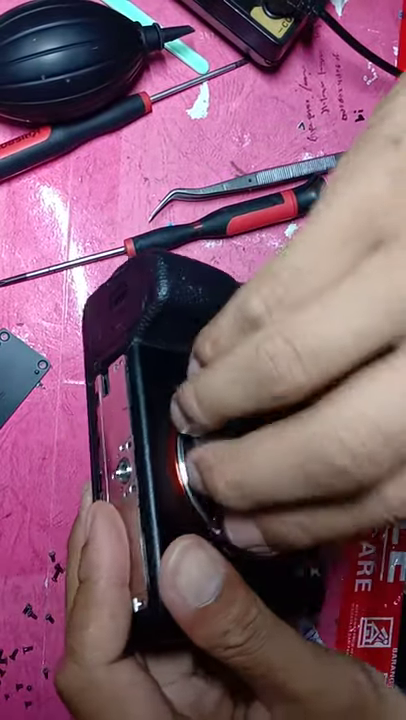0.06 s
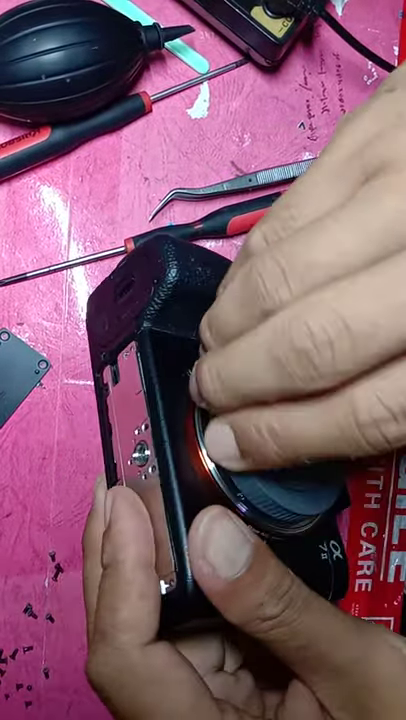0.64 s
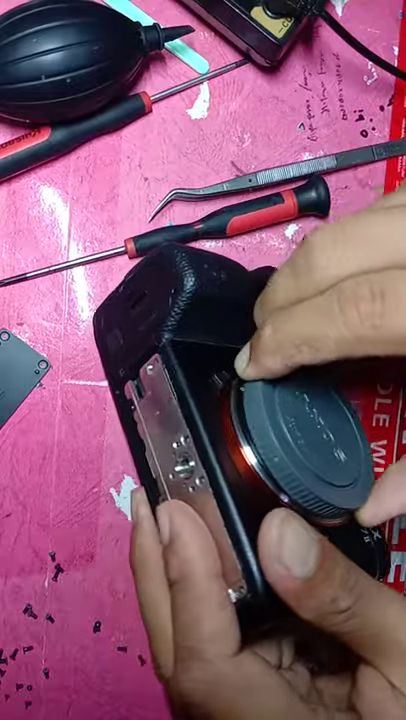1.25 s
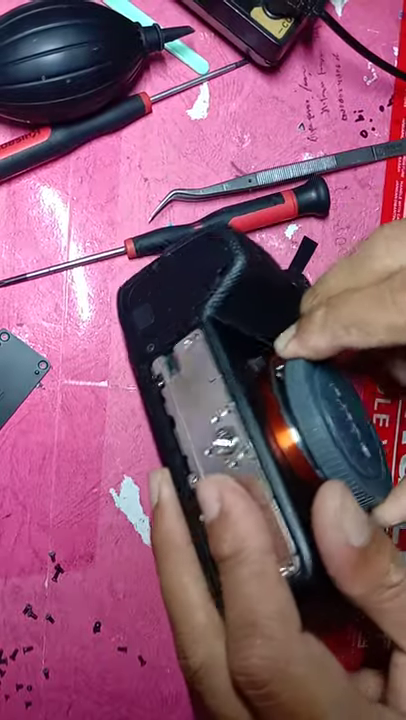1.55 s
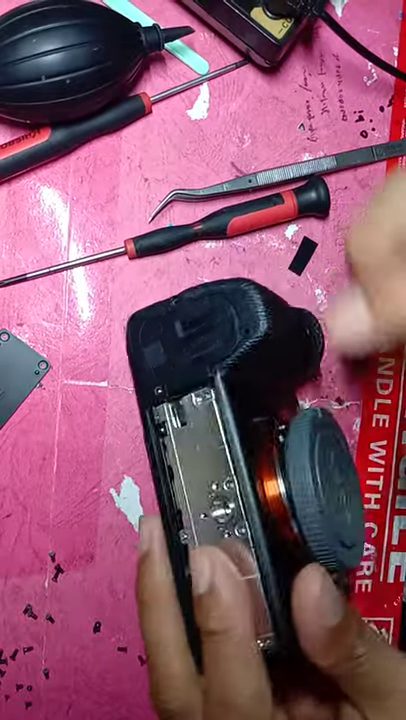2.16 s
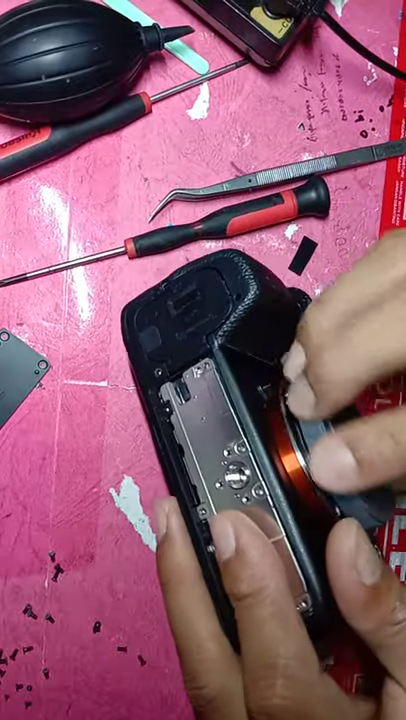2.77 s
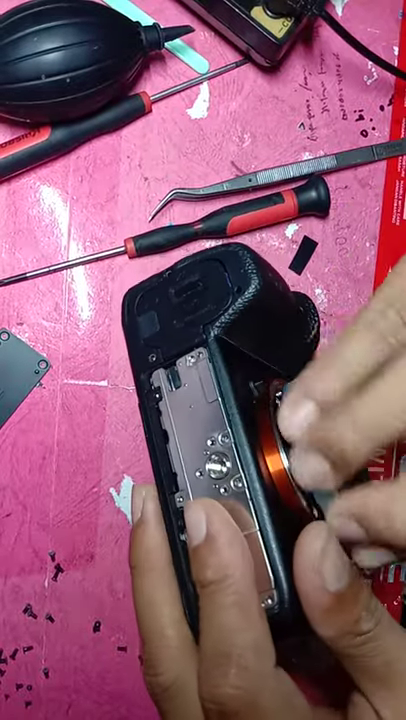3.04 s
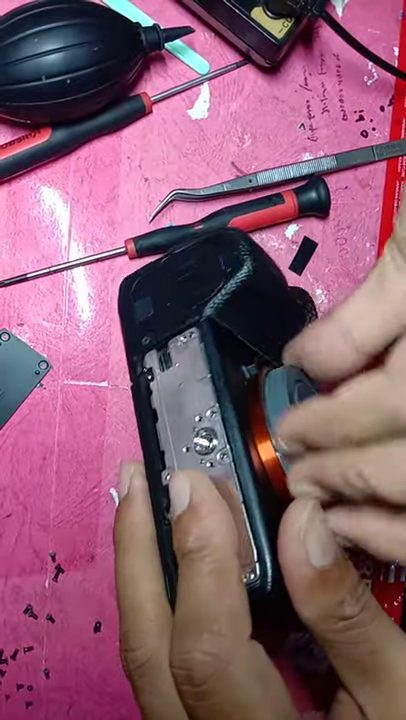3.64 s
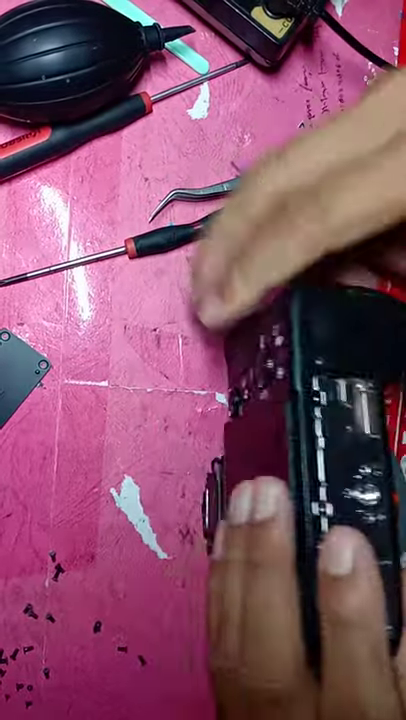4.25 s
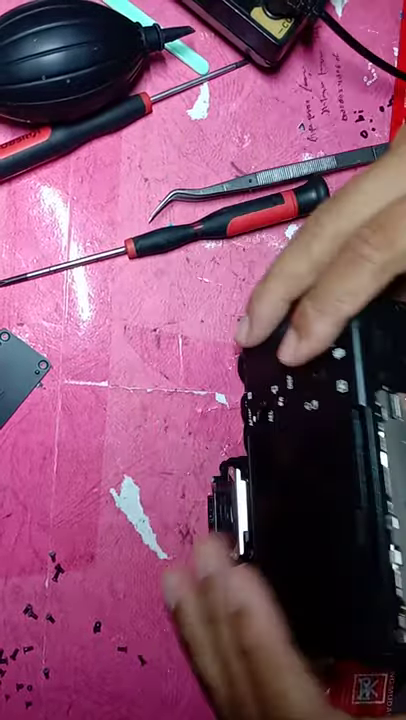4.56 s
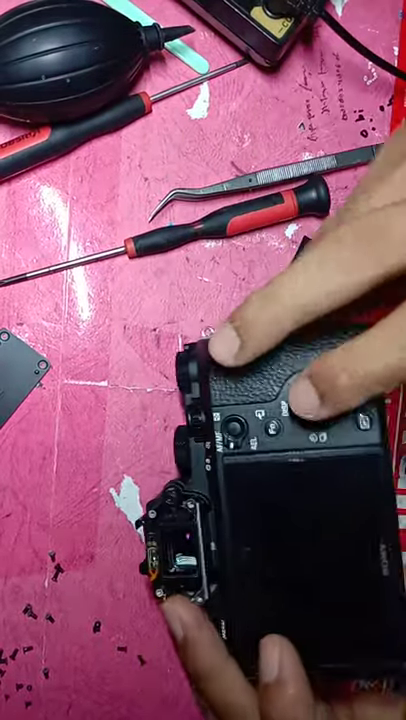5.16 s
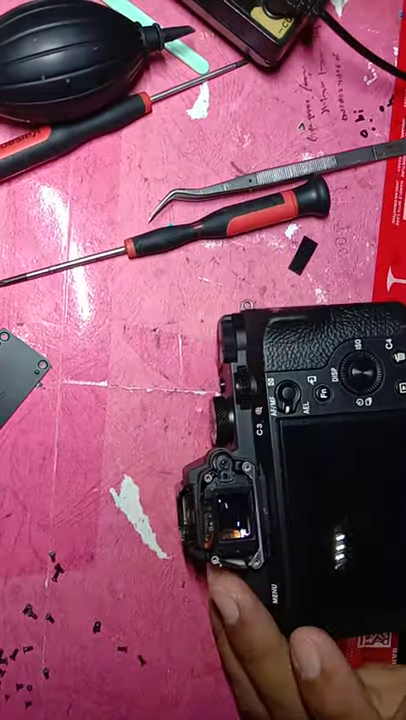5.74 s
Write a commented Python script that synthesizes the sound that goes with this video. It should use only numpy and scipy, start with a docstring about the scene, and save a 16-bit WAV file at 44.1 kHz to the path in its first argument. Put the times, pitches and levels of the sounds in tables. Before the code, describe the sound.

A few light plastic ticks and hollow knocks open the sound as a cap is placed against a camera body, with more small taps between 0.5 and 0.8 seconds. At about 1.1 seconds comes a bright snap with a soft bump in the workbench. Faint taps and brief finger rubs follow, then a firmer double knock at 2.6 seconds and more rubbing and ticking around 3 seconds. At 3.4 seconds a short scrape leads into a sharp, loud snap as the cap locks. The camera lands on the bench with a dull thud at 4.1 seconds, followed by softer bumps, ticks and a faint drag. At 4.8 seconds its casing tips down with a quick, hard clack, and one faint bump comes near 5.3 seconds. Everything is close and centred, with short small-room reflections over a quiet hollow room tone and hiss.

```python
"""Capping a camera on a workbench.

A plastic cap is fitted to a camera body and twisted until it snaps home; the camera is then laid down.
Each contact rings the cap or the casing, bumps thud in the bench, and a small room throws it all back.
Fingers rub the plastic in between, over a quiet, hollow room tone."""
import sys
import numpy as np
from scipy import signal
from scipy.fft import rfft, irfft, next_fast_len
from scipy.io import wavfile
from scipy.ndimage import uniform_filter1d

SR = 44100
rng = np.random.default_rng(int(sys.argv[2]) if len(sys.argv) > 2 else 0)


def transcribe(u):
    """Save the signal u as a 16-bit wav file named by the first command-line argument.

    u: samples, shape (n,) or (channels, n), limited to [-1, 1]; the rate is SR.
    q: integer samples, one column per channel.
    """
    v = np.clip(np.atleast_2d(u).T, -1, 1)
    q = np.round(v * 32767).astype(np.int16)
    wavfile.write(sys.argv[1], SR, q)


N = 260278
T = np.arange(N) / SR
BLOW_SAMPLES = 4096

# bands that shape a blow: edge_hz
BAND_EDGES_HZ = [70, 400, 780, 1500, 2500, 4200, 6500, 15500]
# hiss spectrum: freq_hz, gain_db
HISS_SPECTRUM = [(500, 0), (3000, 0), (5700, 0), (7000, -6), (8500, -5), (13500, -10), (15200, -5)]


def contacts(crack_db=-5, scrape_db=-6, graze_lead_s=.0055):
    """Bright bayonet snaps, dull knocks of the cap, and thin fingernail ticks on the camera's plastic."""
    # time_s, contact_s, level_db, hollow_db, rim_db
    snaps = [(1.0571, .00083, -44, 17, 16), (3.4104, 0.0011, -29.5, 7, 4.5)]
    knocks = [(.081, 0.001, -57, 2, 8.5), (.112, 0.0015, -48, 17, 0.5), (.2281, 0.0043, -63, 14.5, -6),
              (.547, 0.0043, -57.5, 13.5, 12.5), (.576, 0.0034, -48.5, 4, -4), (.68, 0.0026, -56.5, 0, -13),
              (.7672, 0.0021, -46.5, 10.5, 11.5), (1.261, 0.0016, -53.5, 10, 13),
              (1.494, 0.0019, -74.5, 19.5, 4), (1.796, 0.0015, -69, 11.5, -2),
              (1.929, .0017, -56, -7, -7.5), (2.473, 0.0045, -54.5, -0.5, -21),
              (2.621, 0.0015, -45.5, 10.5, -8), (2.63, 0.001, -36, 9, 1), (2.921, 0.0036, -55, 11.5, 0),
              (2.962, 0.0035, -59.5, 2, -4), (2.998, 0.0013, -63.5, 5, -9),
              (3.36, 0.0073, -56.5, -4.5, -26), (4.498, 0.0027, -57, 1, 4.5), (5.335, 0.007, -71, 11.5, -1)]
    ticks = [(.0585, 0.0011, -49.5, 5.5, -11), (4.146, .003, -57.5, 15, -5), (4.48, 0.003, -56, -4, 5.5)]
    # spectrum of each kind: freq_hz, band_db
    snap_spectrum = [(170, -3.5), (550, 2), (1100, 2.5), (1900, -2), (3200, -1.5), (5200, 0), (10000, 1.5)]
    knock_spectrum = [(170, -9), (550, 2.5), (1100, 3), (1900, -2), (3200, -6), (5200, -14.5), (10000, -25)]
    tick_spectrum = [(170, -18), (550, -30.5), (1100, 1), (1900, -4.5), (3200, -0.5), (5200, -11),
                     (10000, -19.5)]
    out = np.zeros(N)
    for blows, spectrum in [(snaps, snap_spectrum), (knocks, knock_spectrum), (ticks, tick_spectrum)]:
        for time_s, contact_s, level_db, hollow_db, rim_db in blows:
            click = bench_bounce(plastic_click(contact_s, crack_db, scrape_db))
            click = match_bands(click, level_db + band_shape_db(spectrum, hollow_db, rim_db))
            add(out, click, time_s - contact_s / 2)
            # a slow contact grazes before it lands
            graze_gain = min(contact_s / .0035, .6) ** 2
            graze = signal.fftconvolve(click, crack(.003) / np.sqrt(SR / 100))
            add(out, graze_gain * graze, time_s - graze_lead_s)
    return out


def plastic_click(contact_s, crack_db, scrape_db, sharp_s=.0016):
    """A short contact rings the plastic at once; a long one is mostly slips that keep exciting it."""
    # cap over the hollow of the mount: pitch_hz, level_db, t60_s
    cap_modes = [(445, -14, .03), (595, -3, 0.023), (865, 1.5, 0.0089), (1093, -6, 0.0083),
                 (1620, -12, .018), (2028, -10, .022), (3010, -9, .014), (3550, -17, 0.027),
                 (4620, -18, 0.012), (5840, -14, .015), (8650, -15, 0.0021), (9200, -12, .0079)]
    # edge crack with the wall's broad resonances: freq_hz, gain_db
    edge_spectrum = [(900, -11), (2100, 2.5), (2400, -2.5), (2900, 3.5), (3500, 8.5), (4000, -7), (4650, 3),
                     (5150, -4), (5550, 7.5), (6300, -10.5), (7900, -5.5), (9100, 5.5), (10200, -4.5),
                     (12300, -14), (13300, -24.5)]
    ringing = ring(cap_modes, detune=.012, scatter_db=1.5)
    slips = crack(contact_s)
    touch = colour(ringing, [(1500, -3), (3000, -10), (6000, -18.5)])
    scrape = signal.fftconvolve(ringing, slips)[:BLOW_SAMPLES]
    return (np.exp(-contact_s / sharp_s) * touch / blow_level(touch)
            + undb(scrape_db) * scrape / blow_level(scrape)
            + undb(crack_db) * colour(slips, edge_spectrum))


def band_shape_db(spectrum, hollow_db, rim_db, hollow_hz=1000, hollow_oct=.5, rim_hz=3500, rim_oct=.55):
    """The point of contact sets how much the air under the cap and the stiff rim ring."""
    edges_hz = np.array(BAND_EDGES_HZ)
    centres_oct = np.log2(edges_hz[1:] * edges_hz[:-1]) / 2
    freq_hz, band_db = np.transpose(spectrum)
    hollow = np.exp(-((centres_oct - np.log2(hollow_hz)) / hollow_oct) ** 2)
    rim = np.exp(-((centres_oct - np.log2(rim_hz)) / rim_oct) ** 2)
    return np.interp(centres_oct, np.log2(freq_hz), band_db) + hollow_db * hollow + rim_db * rim


def match_bands(blow, band_db):
    """Filter a blow towards a level per band: where and how hard the edges meet."""
    edges_hz = np.array(BAND_EDGES_HZ)
    edge_bins = (edges_hz * BLOW_SAMPLES / SR).astype(int)
    centres_hz = np.sqrt(edges_hz[1:] * edges_hz[:-1])
    blow = colour(blow, [(30, -40), (80, -14.5), (140, 1)])  # a small part radiates little bass
    for _ in range(3):
        energy = np.add.reduceat(np.abs(rfft(blow)) ** 2, edge_bins)[:-1] * 2 / BLOW_SAMPLES
        current_db = 10 * np.log10(energy / (SR / 100))
        blow = colour(blow, np.column_stack([centres_hz, band_db - current_db]))
    return blow


def casing(crack_db=-4):
    """The camera tips onto its hard front edge and the casing chatters."""
    # landings: start_s, level_db, contact_s
    knocks = [(4.8249, -39, 0.00036), (4.8273, -32, 0.00156), (4.8291, -34, 0.00081)]
    # casing resonances: pitch_hz, level_db, t60_s
    case_modes = [(511, -5.5, 0.018), (905, 2.5, 0.015), (1467, -7, 0.017), (2090, -9, 0.034),
                  (3030, -5, 0.0099), (3510, -2.5, 0.027), (4200, -32, 0.03), (5330, -31, 0.0084),
                  (6900, -19, 0.011)]
    # freq_hz, gain_db
    edge_spectrum = [(35, -37), (150, 10.5), (500, 1.5), (2000, 5), (3500, 7.5), (5500, 1),
                     (8000, -7.5), (11000, -13), (15000, -46)]
    out = np.zeros(N)
    for start_s, level_db, contact_s in knocks:
        ringing = ring(case_modes, detune=.004, scatter_db=1)
        edge = colour(crack(contact_s), edge_spectrum)
        add(out, undb(level_db) * (ringing / blow_level(ringing) + undb(crack_db) * edge), start_s)
    return out


def bench(rattle_db=-19):
    """Soft pushes make the bench top thud; loose parts in the camera rattle."""
    # padded bumps: start_s, level_db, push_s
    bumps = [(.113, -49, 0.0034), (1.058, -40.5, 0.0014), (3.411, -45, 0.002), (1.496, -77, 0.0021),
             (1.71, -68, 0.0044), (1.796, -60, 0.0029), (1.832, -65, 0.0041), (1.898, -55, 0.003),
             (4.075, -34.5, 0.0036), (4.0823, -26, 0.0011), (4.225, -65, 0.00092), (4.2288, -39, 0.0021),
             (4.51, -58, 0.0067), (4.639, -48.5, 0.0035), (5.31, -61, 0.0057)]
    # bench top resonances: pitch_hz, level_db, t60_s
    bench_modes = [(130, -4.5, 0.047), (215, -1, 0.046), (290, -2, 0.045), (496.4, -13, 0.063),
                   (655, -13.5, 0.029), (1037, -6, 0.033)]
    # freq_hz, gain_db
    rattle_spectrum = [(50, -5.5), (200, 25), (700, 25), (1300, 13.5), (3000, .5),
                       (9000, -27), (15000, -40)]
    out = np.zeros(N)
    for start_s, level_db, push_s in bumps:
        age = np.arange(BLOW_SAMPLES) / SR / push_s
        push = age * np.exp(-6 * age)
        ringing = ring(bench_modes, detune=.0053, scatter_db=.04)
        thud = colour(signal.fftconvolve(ringing, push)[:BLOW_SAMPLES], [(30, -4.5), (110, 1.5)])
        rattle = colour(crack(.012), rattle_spectrum)
        add(out, undb(level_db) * (thud / blow_level(thud) + undb(rattle_db) * rattle), start_s)
    return out


def ring(modes, detune, scatter_db):
    """Damped modes; grip and point of contact shift their pitch and strength at each blow."""
    t = np.arange(BLOW_SAMPLES) / SR
    pitch_hz, level_db, t60_s = np.transpose(modes)[:, :, None]
    pitch_hz = pitch_hz * (1 + detune * rng.standard_normal(pitch_hz.shape))
    level_db = level_db + scatter_db * rng.standard_normal(level_db.shape)
    sign = (-1) ** np.arange(len(modes))[:, None]
    decay = np.exp(-np.log(1000) * t / t60_s)
    return np.sum(sign * undb(level_db) * np.sin(2 * np.pi * pitch_hz * t) * decay, axis=0)


def crack(rise_s):
    """Pitchless burst of tiny slips as two hard edges meet."""
    age = np.arange(BLOW_SAMPLES) / SR / rise_s
    envelope = age * np.exp(-age)
    burst = envelope * rng.standard_normal(BLOW_SAMPLES)
    for _ in range(5):
        whitened = irfft(np.exp(1j * np.angle(rfft(burst))))
        burst = whitened * np.minimum(4 * envelope, 1)
    return burst / blow_level(burst)


def fingers(slips_per_s=1500, spread_db=3.5, uneven_db=-.5):
    """Skin and plastic stick and slip in dense grains; dragging the camera makes the bench drone."""
    # fingers on plastic, camera on the mat: start_s, end_s, level_db
    rubs = [(0, 0.02, -55), (1.888, 1.986, -55.5), (2.458, 2.513, -54), (2.919, 3.043, -52),
            (3.143, 3.261, -61.5), (3.341, 3.402, -49.5), (3.575, 3.755, -58), (3.957, 4.05, -61.5)]
    drags = [(1.49, 1.68, -63), (2.75, 3.05, -66.5), (4.53, 4.7, -63)]
    # their spectra: freq_hz, gain_db
    rub_spectrum = [(50, -33.5), (160, 1), (420, -8.5), (650, -5.5), (1000, 5), (1700, -10.5),
                    (3200, -19.5), (6000, -31.5), (12000, -53.5)]
    drag_spectrum = [(40, -44.5), (110, -18), (142, -1.5), (160, 2.5), (178, -11), (220, -20.5),
                     (320, -33.5), (600, -31), (3000, -71)]
    slips = (rng.random(N) < slips_per_s / SR) * rng.standard_normal(N)
    slips *= undb(spread_db * np.minimum(rng.exponential(size=N), 3))
    rubbing = strokes(rubs) * undb(uneven_db * drift(70)) * unit(colour(slips, rub_spectrum))
    dragging = strokes(drags) * unit(colour(slips, drag_spectrum))
    return rubbing + dragging


def strokes(rows):
    """Pressure rises and falls over each stroke."""
    pressure = np.zeros(N)
    for start_s, end_s, level_db in rows:
        arch = 4 * (T - start_s) * (end_s - T) / (end_s - start_s) ** 2
        pressure += undb(level_db) * np.sqrt(np.clip(arch, 0, 1))
    return pressure


def bench_bounce(x, delay_s=.00315, gain=.55, dull_hz=1800):
    """The matted bench top adds a duller copy just after the direct sound."""
    out = x.copy()
    add(out, gain * colour(x, [(dull_hz, 0), (4 * dull_hz, -18)]), delay_s)
    return out


def room(x, tail_db=-6.5, scatter_db=-12, scatter_t60_s=.07, gap_s=.012, near_gain=.85):
    """Reflections only: distinct echoes, quick scatter from bench clutter, a small room's tail."""
    # reverberation bands: centre_hz, gain_db, t60_s
    bands = [(69.5, -4, .28), (151, 2.5, 0.4), (412.3, 2, 0.25), (900, -3.5, 0.19), (1770, 1, 0.21),
             (3460, -1, 0.18), (5500, 3.5, 0.18), (9520, -6.5, 0.13), (15000, -2, .1)]
    # nearby surfaces: delay_s, gain
    echoes = [(.0109, .12), (.0122, .21), (.0208, .07)]
    size = SR // 2
    t = np.arange(size) / SR
    response = np.zeros(size)
    white = rfft(rng.standard_normal(size))
    age_s = np.maximum(t - gap_s, 0)
    arrival = np.where(t > gap_s, 1, near_gain * (t > .002))  # nearby tools answer before the walls
    centres_hz = [row[0] for row in bands]
    for share, (_, gain_db, t60_s) in zip(np.eye(len(bands)), bands):
        band = irfft(white * on_log_axis(size, np.column_stack([centres_hz, share])), size)
        tail = arrival * np.exp(-np.log(1000) * age_s / t60_s)
        scatter = arrival * np.exp(-np.log(1000) * age_s / scatter_t60_s)
        envelope = np.hypot(undb(tail_db) * tail / np.linalg.norm(tail),
                            undb(scatter_db) * scatter / np.linalg.norm(scatter))
        response += undb(gain_db) * band * envelope
    for delay_s, gain in echoes:
        add(response, np.array([gain]), delay_s)
    return signal.fftconvolve(x, response)[:N]


def background(lift_db=1, hiss_db=-74.5, waver_db=2.5):
    """A hollow room tone and a low rumble swell and waver over steady hiss."""
    # slow swell, before the lift: time_s, tone_db, rumble_db
    swell = [(0.0, -60, -74.5), (0.38, -64, -77), (0.79, -60, -69), (1.53, -59, -74), (1.73, -64.5, -71.5),
             (2.07, -64.5, -76), (2.46, -70.5, -73.5), (2.66, -64, -75), (2.97, -63, -69.5),
             (3.17, -58, -71), (3.6, -56, -73.5), (3.75, -62.5, -77.5), (3.99, -65, -71.5),
             (4.19, -54, -68), (4.37, -64, -67), (4.78, -61, -68.5), (5.03, -65, -75), (5.9, -70.5, -75.5)]
    # spectra: freq_hz, gain_db
    tone_spectrum = [(300, -31.5), (520, -15.5), (700, -7.5), (890, -7), (990, 4.5), (1120, -4), (1270, 1),
                     (1550, -8.5), (1790, -18.5), (2050, -8), (2450, -24.5), (4500, -35), (9000, -67.5)]
    rumble_spectrum = [(25, -35), (60, -16.5), (100, -2), (130, -8), (160, 2.5), (200, -9.5), (255, -12.5),
                       (315, 0.5), (430, -10.5), (800, -18.5), (3000, -57.5), (9000, -80.5)]
    time_s, tone_db, rumble_db = np.transpose(swell)
    tone = noise(tone_spectrum) * undb(np.interp(T, time_s, tone_db) + waver_db * drift(20))
    rumble = noise(rumble_spectrum) * undb(np.interp(T, time_s, rumble_db) + waver_db * drift(33))
    return undb(lift_db) * (tone + rumble) + undb(hiss_db) * noise(HISS_SPECTRUM)


def noise(spectrum):
    """Coloured noise of rms 1."""
    return unit(colour(rng.standard_normal(N), spectrum))


def drift(rate_hz):
    """Smooth random drift of rms 1."""
    hold = int(SR / rate_hz)
    steps = np.repeat(rng.standard_normal(N // hold + 1), hold)
    return unit(uniform_filter1d(steps, hold)[:N])


def colour(x, spectrum):
    """Minimum-phase filter through (freq_hz, gain_db) points."""
    size = 2 * next_fast_len(len(x) // 2 + 1)
    cepstrum = irfft(np.log(undb(on_log_axis(size, spectrum))))
    cepstrum[1:size // 2] *= 2
    cepstrum[size // 2 + 1:] = 0
    return irfft(rfft(x, size) * np.exp(rfft(cepstrum)))[:len(x)]


def on_log_axis(size, points):
    """Interpolate (freq_hz, value) points over FFT bins, in log frequency."""
    freq_hz, value = np.transpose(points)
    return np.interp(np.log(np.fft.rfftfreq(size, 1 / SR) + 1), np.log(freq_hz), value)


def undb(db):
    """Decibels to gain."""
    return 10 ** (np.asarray(db) / 20)


def unit(x):
    """Scale to rms 1."""
    return x / np.sqrt(np.mean(x ** 2))


def blow_level(x):
    """Rms of a blow if all its energy fell within 10 ms."""
    return np.sqrt(np.sum(x ** 2) / (SR / 100))


def add(track, x, start_s):
    """Mix x into the track in place."""
    i = max(0, int(start_s * SR))
    track[i:i + len(x)] += x[:len(track) - i]


def scene(side_hiss_db=-89, bench_send_db=-2):
    """Heard from straight above: every source is centred, with a slight left-right spread."""
    # left and right differ slightly, with a wide fizz in the top treble: freq_hz, side_gain_db
    side_spectrum = [(30, -10), (120, -25), (2000, -27), (5000, -20), (9000, -24), (13000, -8)]
    chatter, thuds, rubbing = casing(), bench(), fingers()
    direct = contacts() + chatter + thuds + rubbing
    # sideways the plastic radiates more crack and less ring than upwards
    sideways = contacts(crack_db=4, scrape_db=-13.5) + chatter + undb(bench_send_db) * thuds + rubbing
    mid = direct + room(sideways) + background()
    side = colour(room(sideways), side_spectrum) + undb(side_hiss_db) * noise(HISS_SPECTRUM)
    return np.array([mid + side, mid - side])


def record(dry, top_hz=15600):
    """Two microphone ports each colour the midrange their own way; the top is cut steeply."""
    # port mismatch around resonance: freq_hz, left_minus_right_db
    ports = [(100, -1.4), (560, -1.8), (700, -.8), (950, 2.3), (1200, 5.7), (1400, 6.1), (1600, 4.3),
             (1900, 0)]
    lean_db = on_log_axis(N, ports) * np.array([[.5], [-.5]])
    ported = irfft(rfft(dry) * undb(lean_db), N)
    return signal.sosfilt(signal.ellip(10, .2, 70, top_hz, fs=SR, output="sos"), ported)


dry = scene()
out = record(dry)
transcribe(out)
```